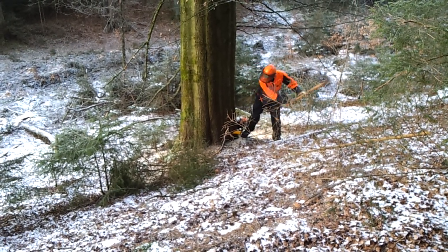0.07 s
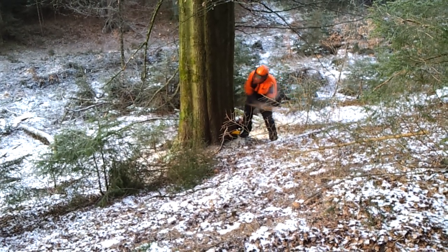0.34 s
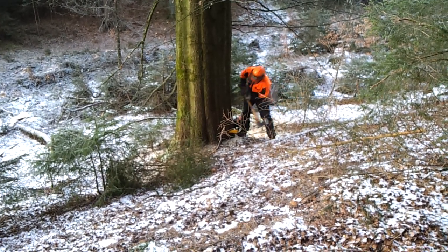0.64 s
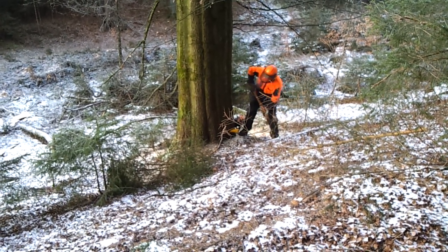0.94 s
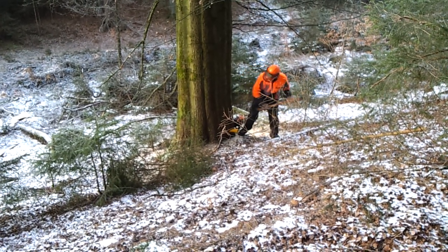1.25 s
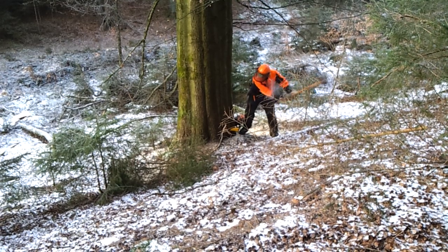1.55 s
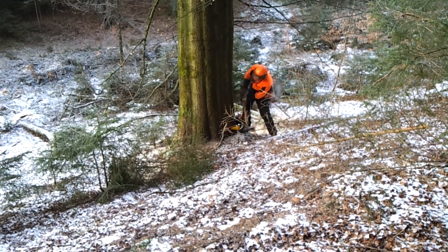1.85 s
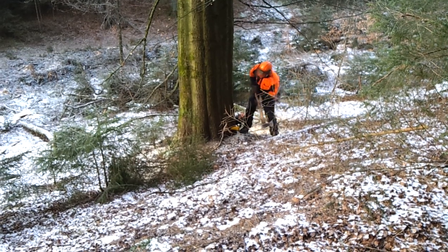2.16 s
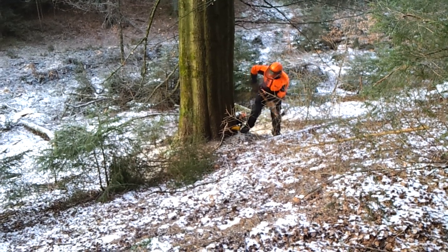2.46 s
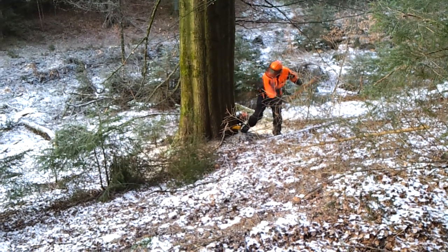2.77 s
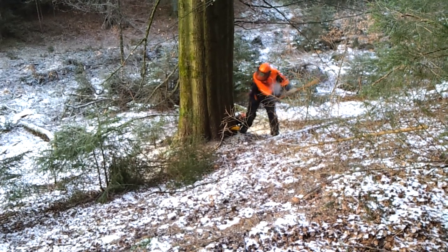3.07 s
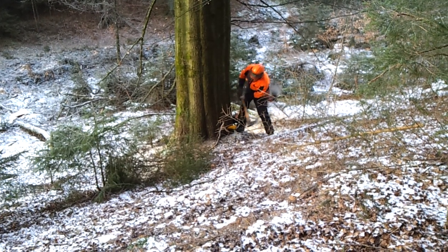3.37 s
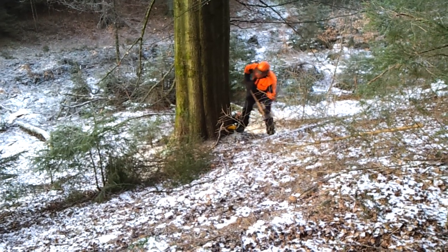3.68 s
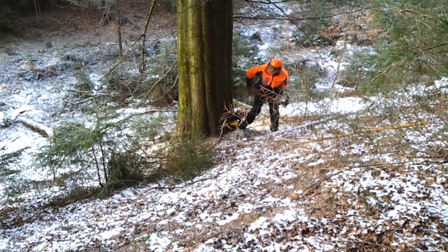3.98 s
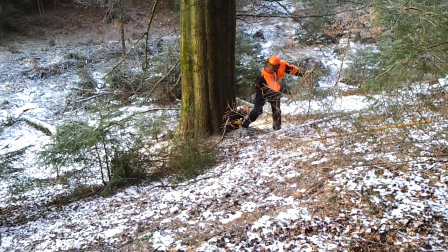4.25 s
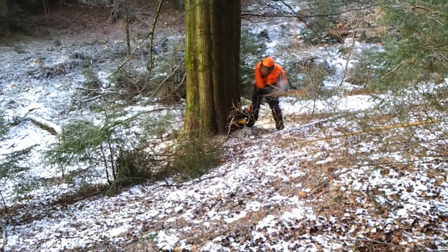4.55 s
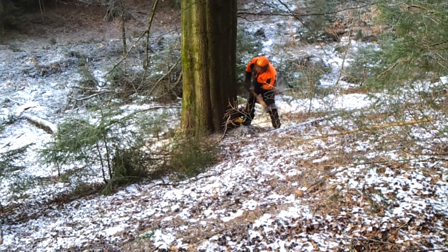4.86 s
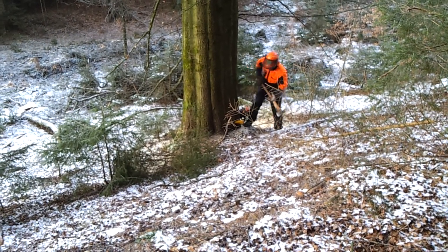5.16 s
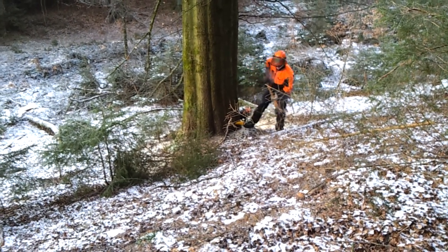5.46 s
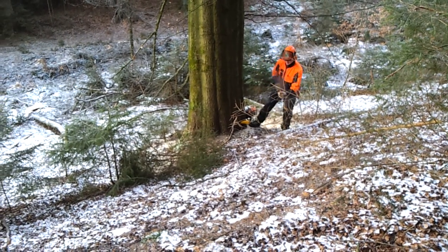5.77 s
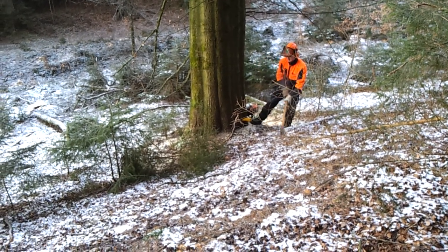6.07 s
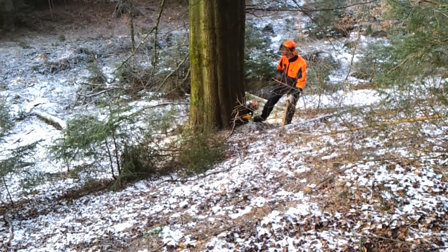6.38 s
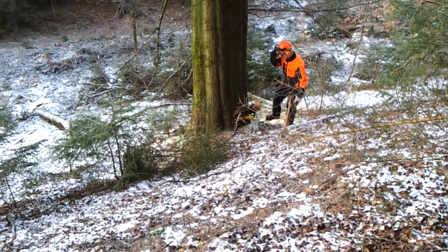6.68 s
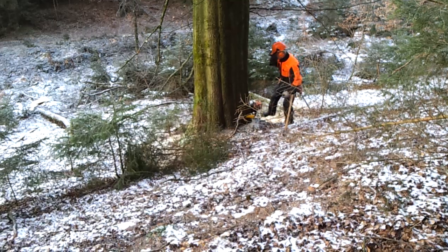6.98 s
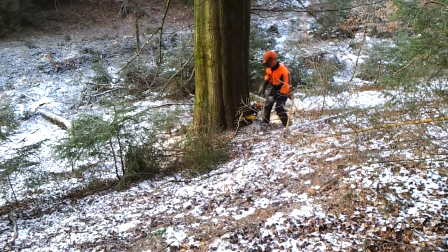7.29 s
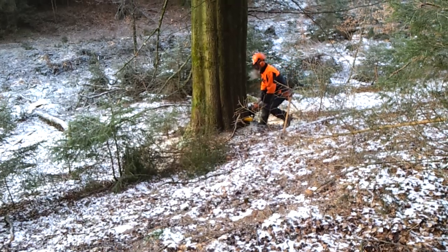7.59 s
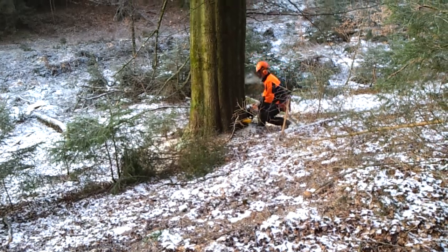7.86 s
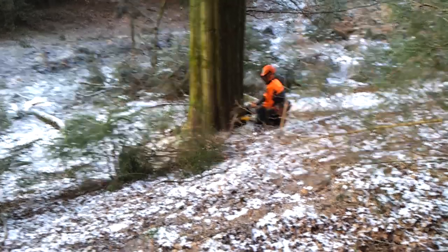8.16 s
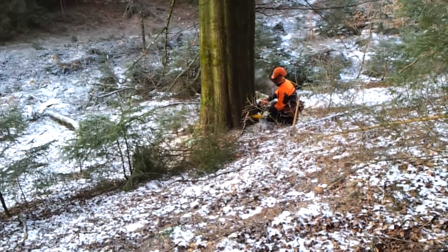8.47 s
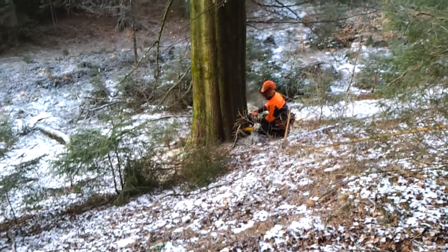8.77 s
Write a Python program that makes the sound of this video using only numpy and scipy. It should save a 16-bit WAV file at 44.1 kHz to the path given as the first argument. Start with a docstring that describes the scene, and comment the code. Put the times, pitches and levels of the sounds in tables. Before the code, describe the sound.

A two-stroke chainsaw idles in a quiet forest, puttering and rattling with irregular sharp pops. Over it, a steel hammer drives a wedge into a tree with four loud, evenly paced blows, each a crack, a woody thud and a brief high ring. The hammering stops, the saw idles alone for a few seconds, then revs up right at the end. The blows slightly overload the microphone.

```python
"""A two-stroke chainsaw idles in a snowy wood: each turn thumps the silencer and rattles the casing,
and every few turns a firing pops. Over it a forester drives a felling wedge with four steel blows,
each a crack, a thud in the trunk and a ringing hammer head. At the end the saw revs up.
Trunks scatter a short tail; the air murmurs. The blows overload a small recorder whose
left microphone is bright and whose right one is dull."""
import sys
import numpy as np
from scipy import signal
from scipy.fft import rfft, irfft, next_fast_len
from scipy.io import wavfile
from scipy.ndimage import uniform_filter1d

SR = 44100
rng = np.random.default_rng(int(sys.argv[2]) if len(sys.argv) > 2 else 0)


def generate_wav(sig):
    """Save sig (samples, or channels by samples) to the path in sys.argv[1] as 16-bit PCM at SR."""
    pcm = np.round(np.clip(np.atleast_2d(sig).T, -1, 1) * 32767).astype(np.int16)
    wavfile.write(sys.argv[1], SR, pcm)


N = 389403
TIME = np.arange(N) / SR

# Hammer blows. Each row: start in seconds, crack, thud and ring gains in dB, ring pitch in Hz,
# ring T60 in seconds, seconds until the head turns its quiet side, overtone gain in dB.
BLOWS = [(0.5271, 4.5, -12.5, 15, 2337, 0.14, 0.046, -18), (1.8966, 6.5, -7.5, 15, 2332, 0.27, 0.14, -17),
         (3.363, 1, -7, 3, 2333, 0.14, 0.08, -35), (4.77, 6.5, -8, 21, 2339, 0.13, 0.034, -20)]
# Higher modes of the steel. Each row: frequency in Hz, gain in dB, T60 in seconds.
STEEL_MODES = [(4470, -5, .18), (4600, -3, .2), (4872, 2, .28), (4980, -1, .32), (6230, -2, .5),
               (6370, 3, .16), (6640, -6, .25), (10750, -4, .22), (10950, -2, .24)]
# Spectra of a blow. Each row: frequency in Hz, relative level in dB.
CRACK_SPECTRUM = [(300, -52), (1000, -12), (1300, -0.5), (1550, -1.5), (1950, 7), (2700, -14.5),
                  (4500, -0.5), (7000, -11), (11000, -16.5), (15000, -22)]
THUD_SPECTRUM = [(30, -32), (80, -1), (150, 8), (300, 2), (600, -2.5), (1050, -1), (1450, -10), (2500, -9),
                 (6000, -60)]
SIZZLE_SPECTRUM = [(500, -8.5), (1500, -1.5), (3200, 3), (4700, 11), (7500, -2), (11000, 6), (12500, 1),
                   (14500, -17)]
# Runs of loud firings at idle. Each row: start in seconds, number of firings, peak gain in dB.
FIRING_RUNS = [(0.0839, 1, -11.5), (0.2876, 2, -18), (1.023, 1, -15), (1.181, 2, -15), (1.3525, 1, -12.5),
               (1.5024, 2, -12.5), (1.8242, 1, -13.5), (2.3841, 2, -14.5), (2.6909, 2, -12.5),
               (2.8618, 1, -11.5), (2.975, 2, -15), (3.1457, 1, -18), (3.3128, 1, -15.5),
               (3.4787, 3, -12.5), (3.773, 1, -10), (3.973, 4, -11.5), (4.6292, 2, -13.5),
               (4.9696, 6, -13.5), (5.6037, 1, -12), (5.8091, 1, -10), (5.937, 1, -8.5), (6.2104, 1, -11),
               (6.4339, 4, -13), (6.8666, 1, -17), (7.534, 2, -12), (7.7392, 1, -12), (8.156, 3, -10.5)]
# Engine speed under throttle. Each row: time in seconds, turns per second.
REV_SPEED = [(8.34, 64.5), (8.42, 66.6), (8.51, 88.9), (8.552, 105.0), (8.584, 114.7), (8.654, 134.5),
             (8.704, 147.9), (8.776, 163.4), (8.83, 163.4)]
# Resonances of the saw. Each row: frequency in Hz, width in Hz, gain in dB.
SILENCER_MODES = [(56, 64, -26), (115, 68, -25), (202, 54, -5), (249, 56.3, -4.5), (306.5, 43, -8.5),
                  (413.7, 19, -14.5)]
CASING_MODES = [(1770, 32, 0.5), (3040, 19, 6), (3546, 37, 9.5), (4630, 70, 3), (4980, 62, 7.5),
                (5160, 43, 6), (8720, 36, 8.5), (9410, 280, 6.5), (11080, 310, 3), (11530, 310, 6.5)]
# Spectra of the saw, idling and revving. Each row: frequency in Hz, relative level in dB.
CLATTER_SPECTRUM = [(400, -26.5), (900, -14.5), (1080, -14.5), (1300, -6.5), (1620, -11.5), (1780, -2),
                    (2000, -7.5), (2280, 0.5), (2600, -8.5), (3300, -14.5), (4150, -7), (5100, -11),
                    (7000, -21.5), (14500, -25.5)]
PUFF_SPECTRUM = [(30, -50), (80, -0.5), (250, -3), (470, -3.5), (600, 2), (760, 0), (1050, -8), (1400, -3),
                 (3000, -18), (7000, -48), (14500, -63)]
POP_SPECTRUM = [(80, -2.5), (300, 0.5), (700, -2.5), (1100, -14), (2100, 9), (3200, -1.5), (4600, 4),
                (7000, -5.5), (11500, -5.5), (14500, -5.5)]
NOTE_SPECTRUM = [(30, -34), (65, 1), (110, 2), (160, -3), (240, 7.5), (330, 2), (440, -5), (560, -13),
                 (3200, -53)]
BARK_SPECTRUM = [(200, -10), (430, -0.5), (600, 2), (740, 7), (880, -3.5), (1020, -1.5), (1200, -0.5),
                 (1600, -4), (2100, 2), (2600, -5), (3200, -12), (5000, -15)]
RASP_SPECTRUM = [(1500, -9), (3300, 0), (4300, 7.5), (5000, 0.5), (5800, 3.5), (7200, -3), (8700, -1.5),
                 (10300, -4.5), (11500, 0), (13000, -2), (14600, -7.5)]
# Air among the trees. Each row: frequency in Hz, relative level in dB.
AIR_SPECTRUM = [(20, -16), (50, -7), (90, -13), (160, 13), (400, -7), (1000, -14), (4000, -23)]
# Microphone imbalance. Each row: frequency in Hz, left minus right in dB.
MIC_BALANCE = [(60, 10), (200, 6), (500, 3.5), (1200, -0.5), (1800, 2.5), (2700, -4), (4200, -2),
               (4900, -12.5), (6500, -5), (7500, 2.5), (8600, 13), (11000, 23.5), (15000, 25)]
# Noise at the two microphones. Each row: frequency in Hz, correlation from -1 to 1.
MIC_CORRELATION = [(60, 1), (1500, 0.88), (2400, 0.78), (3300, -0.71), (4500, -0.4), (5500, -0.096),
                   (15000, -0.14)]

IDLE_HZ, RUN_HZ = 53.0, 53.35   # crank speed: nominal, within a loud run
TURNS_PER_FIRING = 5
THROTTLE_S = 8.343


def hammer(trunk_hz=1474):
    """Steel meets the wedge: a crack, a thud that rings the trunk, a sizzle of weak high modes."""
    starts_s, crack_db, thud_db = np.transpose(BLOWS)[:3]
    crack_env = bursts(starts_s, from_db(crack_db + 3.5), rise_s=0.0016, t60_s=0.047)
    thud_env = bursts(starts_s, from_db(thud_db), rise_s=0.0018, t60_s=0.14)
    sizzle_env = bursts(starts_s, from_db(crack_db - 12.5), rise_s=0.0062, t60_s=0.34)
    crack = colour(stereo_noise() * crack_env, CRACK_SPECTRUM)
    thud = colour(stereo_noise() * thud_env, THUD_SPECTRUM)
    sizzle = colour(stereo_noise() * sizzle_env, SIZZLE_SPECTRUM)
    trunk = from_db(18) * resonate(thud, trunk_hz, width_hz=29)
    return crack + thud + trunk + sizzle + head_ring()


def head_ring(rise_s=0.011, overtone_rise_s=0.0028, left_lag_rad=0.21):
    """The rebounding head radiates from its flat sides, so its note fades and returns as it turns."""
    out = np.zeros((2, N))
    t = TIME[:SR * 3 // 4]
    lag_rad = np.array([[left_lag_rad], [0]])
    for start_s, _, _, ring_db, hz, t60_s, turn_s, overtone_db in BLOWS:
        facing = np.cos(np.pi / 2 * t / turn_s)
        ring = from_db(ring_db) * swell_decay(t, rise_s, t60_s) * facing
        ring = ring * np.sin(2 * np.pi * hz * t - lag_rad)
        for mode_hz, mode_db, mode_t60_s in STEEL_MODES:
            gain = from_db(overtone_db + mode_db + rng.normal(0, 1.5))   # each blow hits another spot
            envelope = gain * (1 - np.exp(-t / overtone_rise_s)) * from_db(-60 * t / mode_t60_s)
            ring += envelope * np.sin(2 * np.pi * (mode_hz * t + rng.random((2, 1))))
        at = round(start_s * SR)
        out[:, at:at + len(t)] += ring
    return out


def idling_saw():
    """Every turn pumps the silencer and rattles the casing; a firing trades some thump for a pop."""
    strokes_s, fires, soft = idle_strokes()
    strokes_s = strokes_s + 0.00015 * rng.standard_normal(len(strokes_s))
    idling = np.clip((THROTTLE_S - TIME) * 10 + 1, 0, 1)
    exhaust = idle_exhaust(strokes_s, fires, idling)
    clatter = piston_clatter(strokes_s, fires, idling)
    return exhaust + casing(clatter + firing_pops(strokes_s[soft]))


def loud_firings():
    """Times in seconds and gains in dB; within a run the cylinder fires every fifth turn."""
    return np.transpose([(start_s + k * TURNS_PER_FIRING / RUN_HZ, db)
                         for start_s, count, db in FIRING_RUNS for k in range(round(count))])


def idle_strokes(coasting=0.075, lead_s=0.0025):
    """A firing kicks the crank, which then slows. Returns turn times, firing mask, soft-firing mask."""
    loud_s, _ = loud_firings()
    edges_s = np.concatenate([[loud_s[0] - TURNS_PER_FIRING / IDLE_HZ], loud_s])
    strokes_s, fires, soft = [], [], []
    for start_s, end_s in zip(edges_s, edges_s[1:]):
        turns = max(1, round((end_s - start_s) * IDLE_HZ))
        # soft firings keep the engine going between loud ones
        for group in np.array_split(np.arange(turns), max(1, round(turns / TURNS_PER_FIRING))):
            progress = np.arange(len(group)) / len(group)
            ahead_turns = coasting * len(group) * progress * (1 - progress)
            strokes_s.append(start_s + (end_s - start_s) * (group - ahead_turns) / turns)
            fires.append(progress == 0)
            soft.append((progress == 0) & (group > 0))
    return np.concatenate(strokes_s)[1:] - lead_s, np.concatenate(fires)[1:], np.concatenate(soft)[1:]


def idle_exhaust(strokes_s, fires, idling, gain_db=-30, fade_start_s=6.1, fade_db_per_s=0.42):
    """Each stroke rings the silencer and puffs out gas; late on, the level slowly falls."""
    pumps = clicks(strokes_s, 1 - 0.45 * fires)
    thump = sum((-1) ** k * from_db(db) * resonate(pumps, hz, width_hz)
                for k, (hz, width_hz, db) in enumerate(SILENCER_MODES))
    gas = bursts(strokes_s, uneven(strokes_s, spread_db=2), rise_s=0.00082, t60_s=0.035)
    puff = colour(stereo_noise() * unit_rms(gas + 0.099 * idling), PUFF_SPECTRUM)
    fade_db = fade_db_per_s * np.maximum(TIME - fade_start_s, 0)
    return from_db(gain_db - fade_db) * (from_db(-0.9) * unit_rms(thump) + from_db(-4) * puff)


def piston_clatter(strokes_s, fires, idling, gain_db=-24, lead_s=0.0024, return_s=0.012):
    """The piston slaps at the top of its stroke and, more softly, on the way back."""
    top_gains = from_db(2 * fires) * uneven(strokes_s, spread_db=2.5)
    back_gains = 0.42 * uneven(strokes_s, spread_db=2)
    slaps = bursts(strokes_s - lead_s, top_gains, rise_s=0.0042, t60_s=0.029)
    slaps += bursts(strokes_s + return_s, back_gains, rise_s=0.0018, t60_s=0.02)
    return from_db(gain_db) * colour(stereo_noise() * unit_rms(slaps + 0.58 * idling), CLATTER_SPECTRUM)


def firing_pops(soft_s, soft_db=-25.5):
    """Each firing, loud or soft, is a sharp burst of noise."""
    loud_s, loud_db = loud_firings()
    gains = np.concatenate([from_db(loud_db), from_db(soft_db) * uneven(soft_s, spread_db=3)])
    envelope = bursts(np.concatenate([loud_s, soft_s]), gains, rise_s=0.00079, t60_s=0.032)
    return colour(stereo_noise() * envelope, POP_SPECTRUM)


def revving_saw(bark_knee_hz=104.5, turbulence_hz=1300):
    """Under throttle every turn fires: a clean exhaust note, a bark and a rasp of gas."""
    speed_hz = np.interp(TIME, *np.transpose(REV_SPEED))
    running = TIME >= THROTTLE_S
    turns = np.cumsum(speed_hz[running]) / SR
    strokes_s = np.interp(np.arange(int(turns[-1]) + 1), turns, TIME[running])
    strokes_s += 0.00003 * rng.standard_normal(len(strokes_s))
    gains = uneven(strokes_s, spread_db=0.7)
    pulses = -clicks(strokes_s, gains) * np.sqrt(SR / speed_hz)
    gas = bursts(strokes_s, gains, rise_s=0.0012, t60_s=0.04) + 0.2 * running
    gas /= np.sqrt(uniform_filter1d(gas ** 2, size=2000).clip(0) + 1e-3)   # hold the power steady
    highpass = signal.butter(2, turbulence_hz, "high", fs=SR, output="sos")
    turbulence = signal.sosfilt(highpass, stereo_noise() * gas)
    sharpness = speed_hz / speed_hz.max()   # the port opens more abruptly at speed
    note = colour(pulses, NOTE_SPECTRUM)
    bark = colour(0.88 * sharpness * pulses + (0.8 - 0.4 * sharpness) * turbulence, BARK_SPECTRUM)
    rasp = casing(colour(stereo_noise() * gas, RASP_SPECTRUM))
    speed_octaves = np.log2(speed_hz / speed_hz.max())
    note_db = -12 + 12 * speed_octaves
    bark_db = -7 + 12.5 * np.minimum(np.log2(speed_hz / bark_knee_hz), 0)
    rasp_db = -9.5 + 6 * speed_octaves
    return from_db(note_db) * note + from_db(bark_db) * bark + from_db(rasp_db) * rasp


def casing(x):
    """The saw's shell lifts a few narrow bands."""
    def gain_at(f):
        return from_db(sum(db / (1 + (2 * (f - hz) / width_hz) ** 2) for hz, width_hz, db in CASING_MODES))
    return convolve(x, min_phase(gain_at))


def forest(x, wet_db, t60_s, rise_s=0.0054):
    """Trunks and the slope scatter a thin, short tail."""
    t = TIME[:SR * 3 // 4]
    tail = stereo_noise(len(t)) * swell_decay(t, rise_s, t60_s)
    return x + from_db(wet_db) * convolve(x, tail / np.linalg.norm(tail[0]))


def air_murmur(gain_db=-45):
    """Low, steady noise of the air among the trees."""
    return from_db(gain_db) * colour(stereo_noise(), AIR_SPECTRUM)


def from_db(db):
    """Decibels to gain."""
    return 10 ** (np.asarray(db) / 20)


def unit_rms(x):
    """Scale to unit power."""
    return x / np.sqrt(np.mean(x ** 2) + 1e-20)


def at_hz(curve, hz):
    """Read a curve on a log-frequency axis."""
    knots_hz, values = np.transpose(curve)
    return np.interp(np.log(hz + 1), np.log(knots_hz), values)


def min_phase(gain_at, size=2048):
    """Minimum-phase impulse response for a gain function of Hz."""
    cepstrum = irfft(np.log(gain_at(np.fft.rfftfreq(size, 1 / SR))))
    cepstrum[1:size // 2] *= 2
    cepstrum[size // 2 + 1:] = 0
    return irfft(np.exp(rfft(cepstrum)))


def convolve(x, response):
    """Filter channels, keeping their length."""
    return signal.oaconvolve(np.atleast_2d(x), np.atleast_2d(response), axes=1)[:, :x.shape[-1]]


def colour(x, spectrum):
    """Shape a white signal at unchanged power."""
    response = min_phase(lambda hz: from_db(at_hz(spectrum, hz)))
    return convolve(x, response / np.linalg.norm(response))


def stereo_noise(size=N):
    """White noise at both microphones: alike in the bass, nearly unrelated in the high treble."""
    padded = next_fast_len(size, True)
    alike = np.clip(at_hz(MIC_CORRELATION, np.fft.rfftfreq(padded, 1 / SR)), -1, 1)
    mid, side = rfft(rng.standard_normal((2, padded))) * np.sqrt([(1 + alike) / 2, (1 - alike) / 2])
    return irfft([mid + side, mid - side], padded)[:, :size]


def clicks(times_s, gains):
    """Impulses placed between samples."""
    out, at = np.zeros(N + 2), np.clip(np.asarray(times_s) * SR, 0, N)
    np.add.at(out, at.astype(int), gains * (1 - at % 1))
    np.add.at(out, at.astype(int) + 1, gains * (at % 1))
    return out[:N]


def swell_decay(t, rise_s, t60_s):
    """Smooth onset, exponential decay."""
    return (1 - np.exp(-(t / rise_s) ** 2)) * from_db(-60 * t / t60_s)


def bursts(times_s, peaks, rise_s, t60_s):
    """Envelope with one swell and decay per event."""
    shape = swell_decay(TIME[:SR // 2], rise_s, t60_s)
    return convolve(clicks(times_s, peaks), shape / shape.max())[0]


def resonate(x, hz, width_hz):
    """One resonance with unit peak gain."""
    r = np.exp(-np.pi * width_hz / SR)
    feedback = [1, -2 * r * np.cos(2 * np.pi * hz / SR), r * r]
    return signal.lfilter(np.array([1, 0, -1]) * (1 - r * r) / 2, feedback, x + 1e-18)


def uneven(times_s, spread_db):
    """A random gain per event."""
    return from_db(spread_db * rng.standard_normal(len(times_s)))


def scene():
    """Hammer and saw stand together at the foot of the tree."""
    saw = forest(idling_saw() + revving_saw(), wet_db=-16.5, t60_s=0.24)
    blows = forest(hammer(), wet_db=-43, t60_s=0.34)
    return blows + saw + air_murmur()


def record(dry, ceiling=0.91, hardness=10, cutoff_hz=14700):
    """Unequal microphones, overload on the peaks, a steep top cut."""
    left = min_phase(lambda hz: np.sqrt(2 / (1 + from_db(-at_hz(MIC_BALANCE, hz)) ** 2)))
    right = min_phase(lambda hz: np.sqrt(2 / (1 + from_db(at_hz(MIC_BALANCE, hz)) ** 2)))
    heard = convolve(dry, np.array([left, right]))
    clipped = heard / (1 + np.abs(heard / ceiling) ** hardness) ** (1 / hardness)
    top_cut = signal.firwin(301, cutoff_hz, fs=SR)
    return signal.oaconvolve(clipped, top_cut[None], mode="same", axes=1)


dry = scene()
out = record(dry)
generate_wav(out)
```